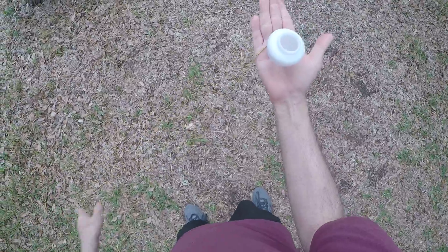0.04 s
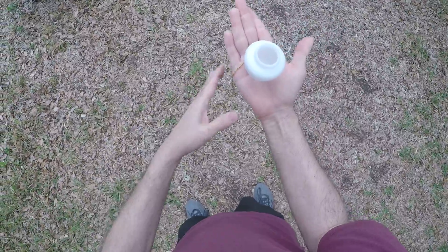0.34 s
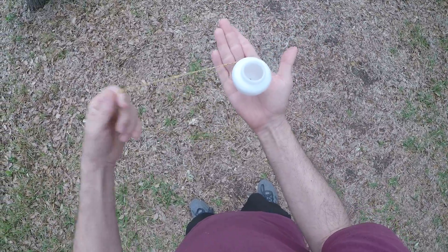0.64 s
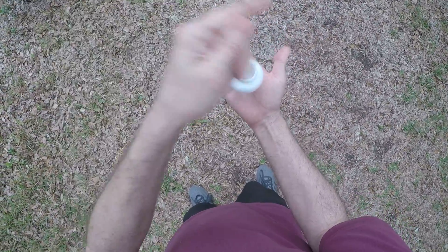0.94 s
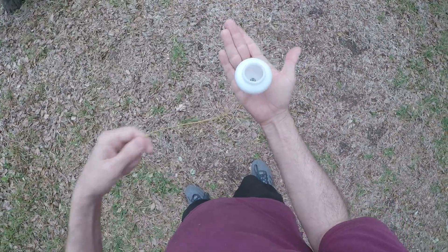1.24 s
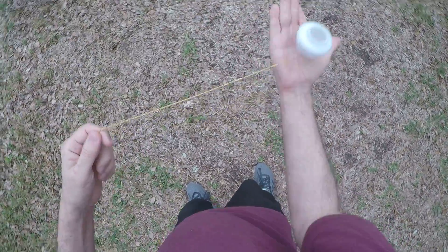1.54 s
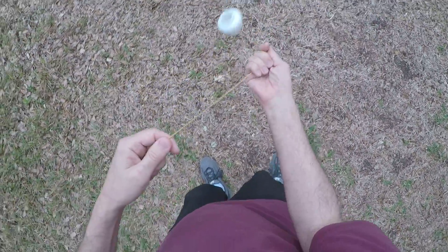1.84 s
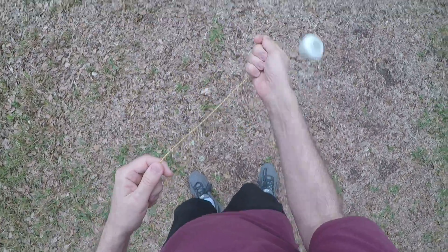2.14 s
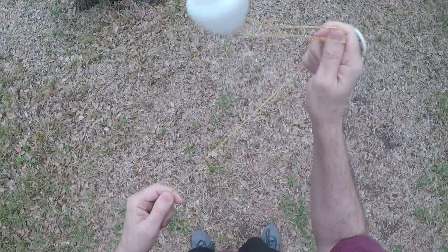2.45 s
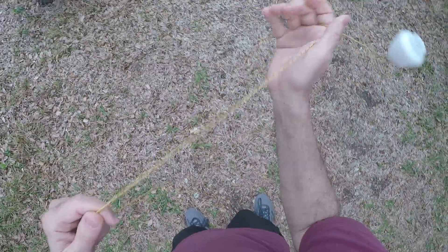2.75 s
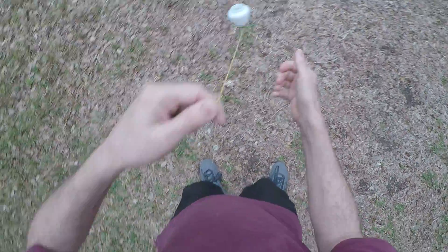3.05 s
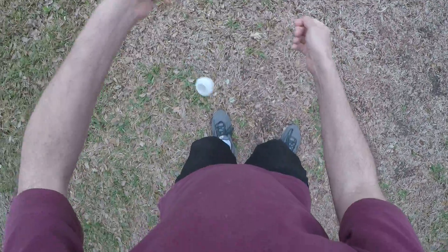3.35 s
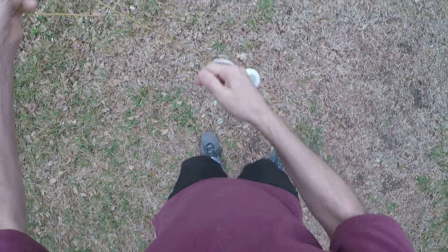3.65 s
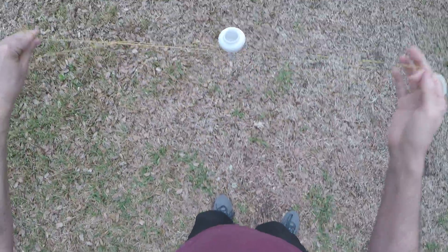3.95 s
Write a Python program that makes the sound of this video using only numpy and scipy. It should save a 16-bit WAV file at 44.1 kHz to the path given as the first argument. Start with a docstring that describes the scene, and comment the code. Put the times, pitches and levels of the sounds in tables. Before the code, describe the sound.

Close by outdoors, a top's bearing spins with a soft whir and thin high ring. Swung on a string, it turns to a louder, chattering hiss with light ticks, over rushing air and a far engine-like hum.

```python
"""A bearing top spins on an open palm outdoors, then is tossed onto its string and swung about.
Its rolling balls drive the shell into forced vibration, so that it hisses and rings: smoothly on the
hand, with a loose chatter on the string. Friction of the string on the tip excites thin resonances.
Behind it lie a steady rush of air, faint wind and a low engine-like drone that slowly grows."""
import sys
import numpy as np
from scipy import signal
from scipy.fft import rfft, irfft
from scipy.io import wavfile

SR = 44100
rng = np.random.default_rng(int(sys.argv[2]) if len(sys.argv) > 2 else 0)


def unload_wav(signal):
    """Save mono or channel-first audio to the path in sys.argv[1] as 16-bit WAV at rate SR, clipped to [-1, 1]."""
    wavfile.write(
        sys.argv[1],
        SR,
        np.round(np.clip(np.atleast_2d(signal).T, -1, 1) * 32767).astype(np.int16),
    )


N = 176400
T, FREQ = np.arange(N) / SR, np.fft.rfftfreq(N, 1 / SR)
CAGE_HZ, MAIN_MODE_HZ = 41, 6200


def amp(db):
    return 10 ** (np.asarray(db) / 20)


def unit(x):
    """Normalisation: the mean of the channels gets rms 1."""
    return x / np.sqrt(np.mean(np.atleast_2d(x).mean(0) ** 2) + 1e-20)


def curves(table):
    """Linear interpolation of each column over time."""
    times, *columns = np.transpose(table)
    return [np.interp(T, times, column) for column in columns]


def spectrum(table):
    """Interpolation over logarithmic frequency."""
    hz, value = np.transpose(table)
    return np.interp(np.log(FREQ + 1), np.log(hz + 1), value)


def drift(hz):
    """Low-pass noise: a slow random fluctuation of rms 1."""
    return unit(irfft(rfft(rng.standard_normal(N)) * np.exp(-(FREQ / hz) ** 2) * (FREQ > 0), N))


def tone(hz):
    """A sinusoid of rms 1 whose phase is the integral of its frequency."""
    return np.sqrt(2) * np.sin(2 * np.pi * (np.cumsum(hz * np.ones(N)) / SR + rng.random()))


def band(hz, width):
    """Heterodyning: low-pass noise is shifted to a centre that may move."""
    gain = np.exp(-2 * (np.fft.fftfreq(N, 1 / SR) / width) ** 2)
    low = np.fft.ifft(np.fft.fft(rng.standard_normal(N)) * gain)
    return unit((low * np.exp(2j * np.pi * np.cumsum(hz * np.ones(N)) / SR)).real)


def resonate(drive, modes, skirt=.78):
    """Resonance: modes add in power, and skirt sets the steepness of their flanks."""
    power = sum(amp(db) ** 2 / (1 + (2 * (FREQ - hz) / width) ** 2) ** (2 * skirt)
                for hz, width, db in modes)
    return unit(irfft(rfft(drive) * np.sqrt(power), N))


# Each row: frequency in Hz, left-minus-right level in dB.
PORT_BALANCE = [(20, -4.5), (200, -4.5), (450, -11), (590, -24), (720, -9), (1050, -3), (2100, 2.5),
                (3400, -1), (6100, 1), (7000, 7.5), (7900, -6), (8900, -9), (10800, -12), (13000, 0)]
# Each row: frequency in Hz, phase lead of the left port in radians.
PORT_LEAD = [(20, 0.5), (300, 0.33), (520, 0.3), (640, 2), (1500, 2.06), (2300, 1.62), (2700, 1),
             (5100, -0.7), (6500, 0.36), (7000, -1.06), (8500, -3), (9500, -5.5), (12000, -5.5)]
# Each row: frequency in Hz, coherence from 0 to 1.
PORT_COHERENCE = [(400, 1), (600, 0.75), (1000, 1), (2500, 0.52), (4000, .95), (9000, 0.45), (13000, .8)]
def noise(gain=1):
    """Partial coherence: noise reaches two microphone ports differing in level and phase."""
    common, separate = rfft(rng.standard_normal((2, N)))
    coherence, phase = spectrum(PORT_COHERENCE), spectrum(PORT_LEAD)
    lean = amp(spectrum(PORT_BALANCE) / 2)
    left = lean * np.exp(1j * phase) * (coherence * common + np.sqrt(1 - coherence ** 2) * separate)
    mono = np.sqrt(lean ** 2 + lean ** -2 + 2 * coherence * np.cos(phase))
    return unit(irfft(np.array([left, common / lean]) * gain / mono, N))


def chatter(depth, hits_per_s=450, scrape_s=.005, spread_db=2.7):
    """Contact force: even rolling plus brief scrapes, bunched once per turn of the ball cage."""
    cage = np.maximum(1 + .45 * tone(CAGE_HZ * (1 + .1 * drift(4.7))), 0)
    hits = (rng.random(N) < hits_per_s / SR) * cage
    hits *= amp(spread_db * np.clip(rng.standard_normal(N), -2, 2)) ** 2
    power = abs(signal.oaconvolve(hits, np.hanning(int(scrape_s * SR)), "same"))
    return np.sqrt(1 - depth + depth * power / power.mean())


# Each row: frequency and width in Hz, relative level in dB on the palm and on the string.
SHELL_MODES = [(4930, 94, -7, -18), (6090, 290, 3, 9), (7000, 360, -4, -3.5), (7760, 96, -9, -27)]
# Each row: time in seconds, relative level in dB as the top is tilted, tossed and swung.
SHELL_LEVEL = [(0, -46), (.08, -43.5), (.23, -47), (.7, -50), (.95, -48), (1.04, -56.5), (1.11, -45.5),
               (1.25, -54), (1.45, -49), (1.56, -37.5), (1.63, -39), (1.71, -46.5), (1.84, -36),
               (1.93, -39.5), (2.04, -48), (2.14, -39.5), (2.33, -40), (2.48, -41), (2.53, -35.5),
               (2.72, -40), (3, -40.5), (3.15, -59.5), (3.31, -46.5), (3.53, -43), (3.68, -52), (3.77, -46),
               (3.9, -53)]
# Each row: time in seconds, added left-minus-right level in dB.
SHELL_PAN = [(0, -1), (1.3, -4.5), (1.6, 1.5), (1.85, -4), (2.1, 3.5), (2.45, -7), (2.72, 3), (3.15, -7)]
def shell(free, force, soft_force, span_hz=550, free_shift=1.009):
    """Forced vibration: the balls excite the shell's modes, which lie higher clear of the hand."""
    rolling = noise()
    near = np.exp(-((FREQ - MAIN_MODE_HZ) / span_hz) ** 2)  # the chatter acts mostly here
    drive = irfft(near * rfft(rolling * force) + (1 - near) * rfft(rolling * soft_force), N)
    held = resonate(drive, [(hz, width, db) for hz, width, db, _ in SHELL_MODES])
    hung = resonate(drive, [(hz * free_shift, width, db) for hz, width, _, db in SHELL_MODES])
    pan_db = curves(SHELL_PAN)[0] * np.array([[.5], [-.5]])
    return ((1 - free) * held + free * hung) * amp(curves(SHELL_LEVEL)[0] + 2 + pan_db)


# Each row: frequency in Hz, width in Hz, relative level in dB.
TREBLE_MODES = [(8620, 160, -2), (8990, 390, -1), (9800, 1100, -16.5), (11950, 960, -14.5),
                (13300, 350, -15.5)]
# Each row: time in seconds, relative level in dB.
TREBLE_LEVEL = [(0, -48.5), (.9, -51), (1.04, -55), (1.11, -50.5), (1.3, -54.5), (1.57, -45), (1.7, -60),
                (1.84, -56), (1.95, -47.5), (2.06, -53), (2.48, -54), (2.54, -39.5), (2.62, -49),
                (2.76, -55), (3.15, -60.5), (3.3, -57), (3.53, -50), (3.68, -56.5)]
def open_end(free, cutoff_hz=11500):
    """Directivity: high modes beam from the open end, and dull as it faces away on the string."""
    bright = resonate(noise(), TREBLE_MODES)
    dull = irfft(rfft(bright) / np.sqrt(1 + (FREQ / cutoff_hz) ** 16), N)
    return ((1 - free) * bright + free * dull) * amp(curves(TREBLE_LEVEL)[0] - 1)


# Each row: frequency in Hz, relative spectral density in dB.
HISS_SPECTRUM = [(1200, 8), (2000, 6), (2700, 2), (3300, 5.5), (4400, 6.5), (8300, -2.5), (13000, -10.5)]
# Each row: time in seconds, relative level in dB.
HISS_ENVELOPE = [(0, -50.5), (1.4, -51), (1.55, -49), (1.87, -46.5), (2.05, -49.5), (2.37, -41.5),
                 (3.02, -44), (3.12, -50.5), (3.35, -45), (3.68, -49.5)]
def hiss():
    """Rolling contact radiates broadband noise beneath the modes."""
    return noise(amp(spectrum(HISS_SPECTRUM))) * amp(curves(HISS_ENVELOPE)[0] - 5)


# Each row: time in seconds, relative level of the tones in dB, level of the rolling noise in dB.
WHIRR_LEVELS = [(0, -46, -40), (.3, -54, -41.5), (.6, -50.5, -42), (.93, -40, -39.5), (1.15, -48.5, -44.5),
                (1.45, -50.5, -42), (1.62, -69, -52)]
# Each row: harmonic of the ball rate, sideband of the spin.
BALL_ORDERS = [(3, -1), (3, 0), (3, 1), (5, 0), (6, -1), (6, 0)]
# Each entry: relative level of one such tone in dB.
BALL_LEVELS = [-1.5, 3.5, -0.5, -15, -16, -13.5]
# Each row: frequency in Hz, relative spectral density in dB.
ROLLING_SPECTRUM = [(600, 3.5), (900, 5), (1200, 2), (1550, -5), (2150, -6.5), (2400, -16), (3300, -13),
                    (4000, -28.5)]
def palm_whirr(ball_hz=376.1, spin_hz=133.4):
    """Modulation: over rolling noise, the spin splits ball-pass tones and the cage pulses a buzz."""
    tones_db, rolling_db = curves(WHIRR_LEVELS)
    pass_hz = ball_hz + .5 * drift(4.5)
    tones = sum(amp(db + 1.6 * drift(36)) * tone(harmonic * pass_hz + side * spin_hz)
                for (harmonic, side), db in zip(BALL_ORDERS, BALL_LEVELS))
    lead = np.exp(.5j * spectrum(PORT_LEAD))
    ports = np.array([lead * amp(spectrum(PORT_BALANCE)), 1 / lead])
    stereo_tones = unit(irfft(rfft(tones) * ports, N))
    buzz = amp(-12) * unit(band(hz=2120, width=260) * np.maximum(1 + tone(CAGE_HZ), 0))
    rolling = noise(amp(spectrum(ROLLING_SPECTRUM))) * amp(rolling_db)
    return (stereo_tones + buzz) * amp(tones_db) + rolling


# Each row of both: frequency in Hz, relative spectral density in dB.
AIR_SPECTRUM = [(20, -31), (60, -7), (120, -6), (170, 2.5), (250, 0), (420, -3.5), (650, -4.5), (850, -13),
                (1100, -23.5), (1500, -32.5), (2600, -42.5), (9000, -49), (14000, -53)]
WIND_SPECTRUM = [(15, 4), (55, 10.5), (85, -2), (125, 2.5), (180, -2.5), (800, -78)]
# Each row: time in seconds, wind level in dB, relative drone level in dB.
LOW_LEVELS = [(0, -39, -38.5), (.95, -54, -46.5), (1.8, -31.5, -38), (2.05, -32, -30.5),
              (2.6, -29.5, -30.5), (2.78, -36, -23), (3.05, -27.5, -33), (3.22, -36, -22),
              (3.3, -32, -29.5), (3.43, -31, -16.5), (3.58, -26, -26), (3.7, -30, -21), (4, -20.5, -28.5)]
# Each row: frequency in Hz, relative level in dB, rms waver in Hz.
DRONE_PARTIALS = [(76.4, -2, 2.45), (96.5, -7.5, 3.23), (113, -13, 4.8)]
# Each row: time in seconds, frequency in Hz, relative level in dB.
HUM_TRACK = [(0, 187.2, -41.5), (1.5, 191, -35.5), (2.05, 193.4, -34), (2.4, 193, -38.5),
             (2.85, 195.7, -31), (4, 195, -37)]
def outdoors():
    """Superposition: an even rush of air, lumpy wind and the wavering partials of a far drone."""
    wind_db, drone_db = curves(LOW_LEVELS)
    hum_hz, hum_db = curves(HUM_TRACK)
    air = noise(amp(spectrum(AIR_SPECTRUM))) * amp(-30.5 + .5 * drift(30))
    wind = noise(amp(spectrum(WIND_SPECTRUM))) * amp(wind_db + drift(5.3))
    drone = sum(amp(db) * tone(hz + waver * drift(5.65)) for hz, db, waver in DRONE_PARTIALS)
    hum = amp(hum_db + 1.07 * drift(12)) * tone(hum_hz + 1.87 * drift(15.6))
    return air + wind + (amp(drone_db) * drone + hum) * amp([[-2.2], [1.8]])


def whine(hz=8631):
    """A thin, steady tone with slight random frequency modulation."""
    return amp(-66) * tone(hz + 4 * drift(32))


# Each row: frequency in Hz, width in Hz, relative level in dB.
STRING_MODES = [(5020, 100, -3), (5450, 750, -6.5), (7850, 150, -1)]
# Each row: time in seconds, level in dB.
STRING_LEVEL = [(1.42, -80), (1.55, -54), (1.9, -51), (2.03, -62), (2.16, -48.5), (2.36, -42.5),
                (2.45, -52), (3.02, -51.5), (3.14, -80)]
def string_rub(force):
    """Friction: the string rubs the tip and excites resonances of its own."""
    return resonate(noise() * np.sqrt(force), STRING_MODES) * amp(curves(STRING_LEVEL)[0])


# Each row: start and length in seconds, centre and width in Hz, peak level in dB.
RASP_BURSTS = [(1.455, .16, 4800, 700, -52), (2.4, .17, 9900, 4600, -56), (2.512, .09, 9800, 5000, -49.5),
               (2.618, .13, 9900, 4200, -50.5), (3.275, .085, 6850, 900, -44), (3.39, .18, 6850, 900, -46)]
def rasps():
    """Directivity: as the open end swings past, bright noise rises quickly and fades more slowly."""
    out = np.zeros((2, N))
    for start, length, hz, width, db in RASP_BURSTS:
        swell = np.sin(np.pi * np.sqrt(np.clip((T - start) / length, 0, 1)))
        out += amp(db) * swell * noise(np.exp(-2 * ((FREQ - hz) / width) ** 2))
    return out * chatter(depth=.54)


# Each row: time in seconds, centre in Hz, relative level in dB.
SWING_TRACK = [(1.5, 4720, -59), (1.68, 3280, -57), (1.76, 3304, -54), (1.87, 4560, -55.5),
               (2.02, 4430, -58.5), (2.3, 4194, -52.5), (2.42, 3400, -55), (2.58, 3965, -57),
               (3, 3969, -55.5), (3.2, 4200, -79), (3.36, 3580, -56), (3.6, 3700, -65)]
def swing_hiss(free):
    """Narrowband noise whose centre wanders as the top swings."""
    hz, db = curves(SWING_TRACK)
    return free * amp(db + 2.5) * band(hz, width=560)


# Each row: start in seconds, relative peak level in dB.
IMPACTS = [(1.582, -21), (1.822, -22), (1.8385, -27), (1.8444, -30), (2.136, -21), (2.3166, -22.5),
           (2.3444, -20.5), (2.367, -21.5), (2.8926, -33), (2.9197, -22)]
def knocks(rise_s=.0015):
    """Impact excitation: hard contacts sound the main mode and a spit of noise for milliseconds."""
    out, spit = np.zeros(N), band(MAIN_MODE_HZ, width=800)
    for start, db in IMPACTS:
        age = np.clip((T - start) / rise_s, 0, 30)
        envelope = (age * np.exp(1 - age)) ** 2
        out += amp(db - 5.5) * envelope * (tone(MAIN_MODE_HZ) + .5 * spit)
    return out


# Each row: start and length in seconds, lowest centre frequency in Hz, peak level in dB.
WHISTLE_NOTES = [(2.82, .13, 2057, -50), (2.945, .05, 2650, -56), (3.08, .045, 2650, -59),
                 (3.115, .12, 3200, -53), (3.15, .18, 2050, -50.5), (3.346, .5, 1238, -54.5)]
def whistles(bend=.05):
    """Narrowband noise is heard as pitch: faint airy whistles that dip and rise again."""
    out = np.zeros(N)
    for start, length, hz, db in WHISTLE_NOTES:
        progress = np.clip((T - start) / length, 0, 1)
        swell = np.sin(np.pi * progress ** (2 / 3))
        out += amp(db) * swell * band(hz * (1 + bend * (1 - 2 * progress) ** 2), width=150)
    return out


# Each row: time in seconds, freedom from 0 (palm) to 1 (string), chatter depth from 0 to 1.
SUSPENSION = [(0, 0, .15), (1.44, 0, .15), (1.56, .8, .75), (1.8, 1, .8), (2.55, 1, .6), (3.02, 1, .85),
              (3.15, 1, .35)]
def bearing(flutter_db=1.0):
    """Amplitude modulation: one contact force shakes ring, rub and hiss; all flutter with the wobble."""
    free, depth = curves(SUSPENSION)
    force = chatter(depth)
    soft_force = force ** .25  # the hiss follows the chatter only weakly
    ringing = shell(free, force, soft_force) + string_rub(force)
    hissing = (open_end(free) + hiss() + swing_hiss(free)) * soft_force
    return (ringing + hissing) * amp(flutter_db * drift(20.6))


def scene():
    """Superposition of the top and the open air."""
    return bearing() + palm_whirr() + outdoors() + whine() + rasps() + knocks() + whistles()


def record(dry, cutoff_hz=13900):
    """Band limiting by a linear-phase low-pass filter."""
    lowpass = signal.firwin(255, cutoff_hz, window=("kaiser", 9), fs=SR)
    return signal.oaconvolve(dry, lowpass[None], "same")


dry = scene()
out = record(dry)
unload_wav(out)
```